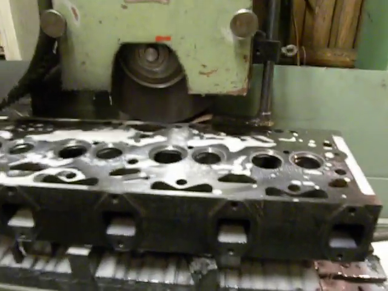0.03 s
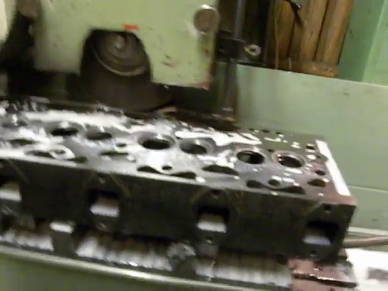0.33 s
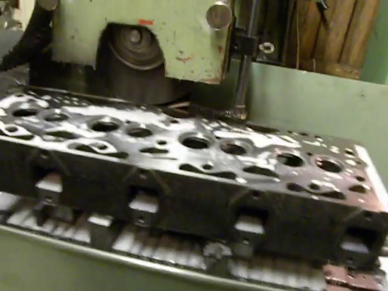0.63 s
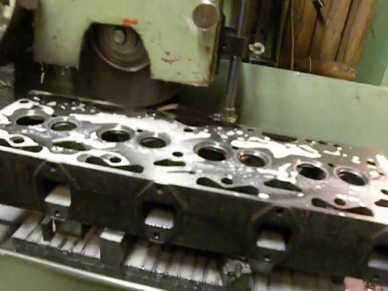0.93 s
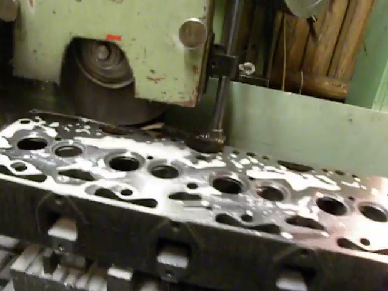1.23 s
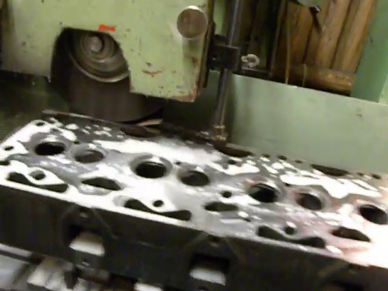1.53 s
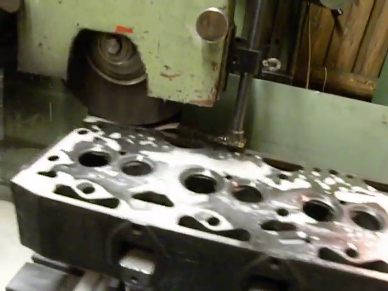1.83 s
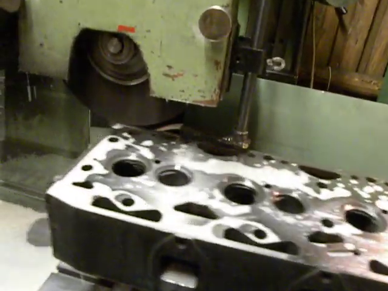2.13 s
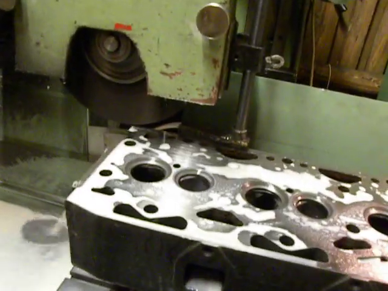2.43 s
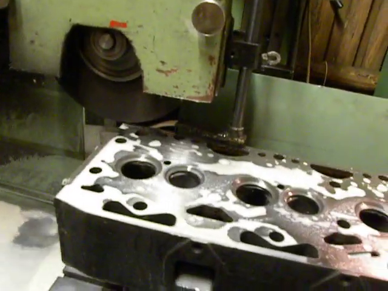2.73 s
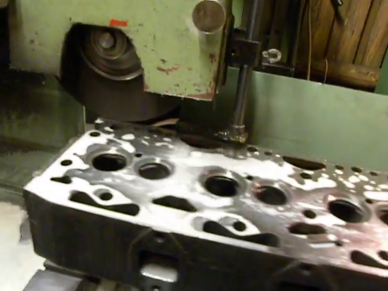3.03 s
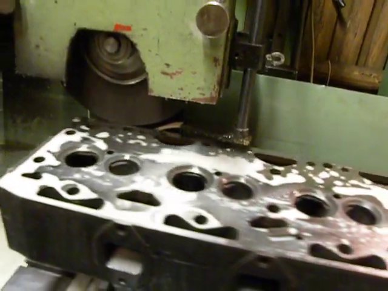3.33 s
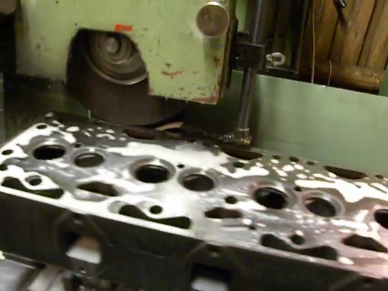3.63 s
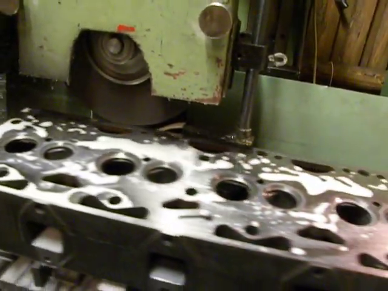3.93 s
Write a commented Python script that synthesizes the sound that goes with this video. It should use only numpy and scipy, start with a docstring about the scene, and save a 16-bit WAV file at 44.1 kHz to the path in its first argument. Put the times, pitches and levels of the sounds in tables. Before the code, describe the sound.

A surface grinder runs for the whole four seconds, a loud, even coolant hiss over the rush of its wheel on metal. Faint wavering whines and ringing sit above a low motor hum and rumble. Sharp clicks stand out at about 0.3 and 0.7 seconds, with lighter ticks scattered afterwards and a cluster near 3.5. The table shudders softly around 2.8 seconds. The sound is dry, with dulled highs.

```python
"""A surface grinder's wheel rushes and rings as a wet cylinder head travels under it.
Rubbing excites the wheel's resonances and grains scratch; coolant hisses loudly off the wheel.
Coolant plinks, dull knocks and sharp grit ticks each give a short decaying ring. Close whines beat,
the motor hums on its shaft and belt orders, the frame rumbles and the table bumps.
A narrow-band microphone picks it up; its limiter ducks after the peaks."""
import sys
import numpy as np
from scipy import signal
from scipy.fft import rfft, irfft, next_fast_len
from scipy.io import wavfile
from scipy.ndimage import uniform_filter1d, minimum_filter1d, map_coordinates

SR = 44100
rng = np.random.default_rng(int(sys.argv[2]) if len(sys.argv) > 2 else 0)


def output_pcm(signal):
    """Save a mono or channel-first signal as 16-bit PCM at the path in sys.argv[1].

    Samples are clipped to [-1, 1] before scaling.
    """
    pcm = np.clip(np.atleast_2d(signal).T, -1, 1) * 32767
    wavfile.write(sys.argv[1], SR, np.round(pcm).astype(np.int16))


N = 176400
TIME = np.arange(N) / SR
SHAFT_HZ, BELT_HZ = 48.01, 16.0
ATTACK_S = .0005  # rise time constant of short rings and scratches


def amp(db):
    """Decibels to amplitude ratio."""
    return 10 ** (np.asarray(db) / 20)


def unit(x):
    """Normalisation to rms 1."""
    return x / np.sqrt(np.mean(x ** 2) + 1e-20)


def curves(rows):
    """Linear interpolation, to one value per sample, of each column after the time."""
    times, *columns = np.transpose(rows)
    return [np.interp(TIME, times, column) for column in columns]


def wobble(knots_per_s):
    """Smooth random modulation: a spline through Gaussian values."""
    knots = rng.standard_normal(int(N * knots_per_s / SR) + 4)
    return map_coordinates(knots, [np.arange(N) * knots_per_s / SR])


def filtered(x, response):
    """Linear filtering: the spectrum of x is multiplied by a frequency response."""
    size = next_fast_len(N + SR // 2)
    return irfft(rfft(x, size) * response(np.fft.rfftfreq(size, 1 / SR)), size)[:N]


def noise_band(response):
    """White noise shaped by a frequency response, at rms 1."""
    return unit(filtered(rng.standard_normal(N), response))


def rush(spectrum, patchy_db=1.5):
    """Coloured noise of rms 1, modulated in random patches of time and frequency."""
    cells = signal.stft(rng.standard_normal(N), nperseg=1024)[2]
    patches = uniform_filter1d(rng.standard_normal(cells.shape), size=4, axis=0)
    patches = uniform_filter1d(patches, size=8, axis=1)
    noise = signal.istft(cells * amp(patchy_db * unit(patches)), nperseg=1024)[1][:N]
    hz, db = np.transpose(spectrum)
    return unit(filtered(noise, lambda f: amp(np.interp(np.log(f + 1), np.log(hz), db))))


def tone(hz, waver_db, drift_rad):
    """A sinusoid of rms 1 under slow random amplitude and phase modulation."""
    phase = 2 * np.pi * (hz * TIME + rng.random()) + drift_rad * wobble(3.12)
    return unit(np.sin(phase) * amp(waver_db * wobble(4.2497)))


def wheel_rush(gain_db=4.5):
    """Broadband noise: the spinning wheel radiates a continuous spectrum."""
    # spectrum of the rush (frequency [Hz], relative density [dB])
    spectrum = [(100, -63.5), (300, -17), (450, -2.5), (750, -0.5), (1000, -1.5), (1350, 1), (1700, -3),
                (2000, -4), (2400, -6), (3200, -34.5), (4500, -71.5)]
    # its envelope (time [s], relative level [dB])
    envelope = [(0, -30.5), (.6, -29), (1.1, -30.5), (1.65, -29), (2.15, -30), (2.65, -28.5), (2.8, -30),
                (2.95, -28), (3.5, -30.5), (3.75, -28.5), (4, -28.5)]
    return amp(curves(envelope)[0] + gain_db) * rush(spectrum)


def wheel_ring():
    """Resonance: rubbing drives two groups of narrow modes, which swell and fade with the contact."""
    # wheel modes, a lower and an upper group (frequency [Hz], bandwidth [Hz], relative level [dB])
    groups = [
        [(2434.3, 18, 0), (2460.9, 40, -1)],
        [(2996, 24, -0.5), (3074.9, 10, 1.5), (3140.2, 23, -7.5)],
    ]
    # their envelopes (time [s], lower group's level [dB], upper group's level [dB])
    envelopes = [(0, -42.5, -32.5), (.27, -28, -35), (.45, -41, -41.5), (.8, -36.5, -37.5),
                 (1.05, -36, -44.5), (1.25, -34, -38.5), (1.5, -34, -36), (1.78, -32.5, -30),
                 (2.02, -35, -37), (2.25, -36.5, -30), (2.42, -34, -30), (2.6, -28, -35.5),
                 (2.9, -44.5, -42), (3.27, -45, -27.5), (3.47, -31, -42), (3.78, -42.5, -27),
                 (4, -38, -37.5)]

    def ring(modes):
        return noise_band(lambda f: sum(amp(db) * width * f / (width * f + 1j * (f * f - hz * hz))
                                        for hz, width, db in modes))
    return sum(amp(db) * ring(modes) for modes, db in zip(groups, curves(envelopes)))


def grit(sigma_hz=670, t60_s=.02):
    """Friction transients: a grain catching under the wheel gives a broad, decaying noise burst."""
    # scratches (time [s], level [dB], centre frequency [Hz])
    scratches = [(1.2095, -9.5, 3180), (2.142, -15, 3345), (2.293, -15.5, 3200), (2.327, -14.5, 2997),
                 (2.801, -15.5, 3853), (3.37, -14.5, 3560)]
    out = np.zeros(N)
    for start, db, hz in scratches:
        age = np.maximum(TIME - start, 0)
        scratch = noise_band(lambda f: np.exp(-.5 * ((f - hz) / sigma_hz) ** 2))
        out += amp(db - 60 * age / t60_s) * (1 - np.exp(-age / ATTACK_S)) * scratch
    return out


def coolant_spray(gain_db=3.5, flutter_db=.16, pulse_depth=.047):
    """Amplitude-modulated noise: coolant hisses off the wheel, pulsing slightly with each turn."""
    # spectrum of the hiss (frequency [Hz], relative density [dB])
    spectrum = [(800, -65), (1900, -15.5), (2350, -1.5), (2800, -0.5), (3100, -0.5), (3350, -5), (3700, -5),
                (4000, -9), (4700, -8.5)]
    # its envelope (time [s], relative level [dB])
    envelope = [(0.0, -20), (0.22, -21.5), (0.41, -22.5), (2.44, -22), (2.83, -22.5), (3.24, -22.5),
                (3.48, -22), (4.0, -21.5)]
    pulse = 1 + pulse_depth * np.sin(2 * np.pi * SHAFT_HZ * TIME)
    level_db = curves(envelope)[0] + gain_db + flutter_db * wobble(120)
    return amp(level_db) * pulse * rush(spectrum)


def plinks_knocks_ticks(rise_per_s=1.2, spatter_per_s=180, spatter_hz=2732.2, spatter_t60_s=.042):
    """Damped oscillation: plinks, knocks, ticks and random spatter ring briefly, rising in pitch."""
    # coolant plinks, dull knocks and sharp grit ticks
    # (time [s], level [dB], starting frequency [Hz], 60 dB decay time [s])
    events = [(0.0276, -5, 3261, 0.0169), (.038, -9, 3212, .015), (.1314, .5, 2950, .011),
              (.3358, 9.5, 3220, .009), (.6468, -2, 3000, .012), (.6813, 8.5, 3070, .013),
              (0.6896, -1.5, 2913, 0.02274), (0.734, -7, 3261, 0.02035), (.776, -11, 1648, 0.01801),
              (.860, -8.5, 2888, 0.019), (1.1218, -9, 1642, 0.01616), (1.2125, -5, 4057, 0.011126),
              (1.6419, -8, 2949, 0.028), (1.756, -8.5, 2947, 0.0327), (2.1412, -3.5, 2761, 0.016296),
              (2.1431, -5, 3649, .008), (2.301, -10.5, 1690, 0.019), (2.868, -7, 3534, 0.024),
              (2.869, -10.5, 4435, 0.019), (3.516, -4, 2642, 0.010946), (3.535, -2, 3939, 0.01346),
              (3.5514, -2, 3070, 0.022), (3.5537, -4, 3762, .01)]
    spatter = []
    for when, strength, pitch in rng.random((int(spatter_per_s * N / SR), 3)):
        db = -29 - 3 * np.log(1 - .98 * strength)  # most are faint
        spatter.append((when * N / SR, db, spatter_hz * (1 + .28 * (pitch - .5)), spatter_t60_s))
    out, age = np.zeros(N + SR), np.arange(SR // 16) / SR
    for start, db, hz, t60 in events + spatter:
        ring = np.sin(2 * np.pi * hz * age * (1 + rise_per_s * age / 2))
        envelope = amp(db - 60 * age / t60) * (1 - np.exp(-age / ATTACK_S))
        out[round(start * SR):][:len(age)] += envelope * ring
    return out[:N]


def whines(neighbour_hz=1151.3, neighbour_db=-37):
    """Beating: the lowest two whines and a steadier neighbour between them interfere in a throb."""
    # four spindle and motor whines (frequency [Hz])
    pitches = [1144.3, 1155.5, 1683.3, 2401]
    # their levels as the microphone moves through their pattern (time [s], level of each [dB])
    envelopes = [(0, -26.5, -41, -31.5, -33.5), (.35, -39, -34, -29.5, -46), (.6, -35.5, -32.5, -38, -45.5),
                 (1.0, -32, -30, -44.5, -35), (1.25, -36, -30.5, -39.5, -25.5),
                 (1.48, -36, -35, -41, -27.5), (1.62, -35.5, -38, -38, -34),
                 (2.0, -31, -40.5, -33.5, -32.5), (2.3, -29.5, -40, -31.5, -38),
                 (2.6, -26, -38.5, -35.5, -41.5), (3.0, -30, -35.5, -35, -41.5),
                 (3.4, -29, -37, -32.5, -41.5), (3.65, -30, -40.5, -36.5, -35.5),
                 (4, -30.5, -39.5, -34.5, -45)]
    lines = sum(amp(db) * tone(hz, waver_db=1.5, drift_rad=.15)
                for hz, db in zip(pitches, curves(envelopes)))
    return lines + amp(neighbour_db) * tone(neighbour_hz, waver_db=1.5, drift_rad=.092)


def motor():
    """Rotational harmonics: shaft and belt hum at multiples of their rates, beside other machine tones."""
    # motor hum (multiple of the shaft rate, level [dB])
    shaft_orders = [(3, -44.5), (6, -39), (9, -36), (15, -38), (18, -47.5), (27, -39), (51, -38.5),
                    (52, -44)]
    # belt drone (multiple of the belt rate, level [dB])
    belt_orders = [(32, -38.5), (33, -38), (35, -46), (70, -43), (73, -46.5), (74, -43.5), (80, -42.5),
                   (82, -42)]
    # bearing, pump and gear tones (frequency [Hz], level [dB])
    tones = [(226, -46), (548, -39.5), (627, -41), (901, -43), (1462, -53.5), (1518, -42.5), (1583, -47.5),
             (2099, -48), (2681, -44), (2999, -41), (3084, -38.5)]
    shaft = sum(amp(db) * tone(k * SHAFT_HZ, waver_db=2.6352, drift_rad=.14) for k, db in shaft_orders)
    belt = sum(amp(db) * tone(k * BELT_HZ, waver_db=3, drift_rad=.15) for k, db in belt_orders)
    return shaft + belt + sum(amp(db) * tone(hz, waver_db=4, drift_rad=.39) for hz, db in tones)


def frame_rumble():
    """Structural vibration: the frame radiates low-frequency noise."""
    # spectrum of the rumble (frequency [Hz], relative density [dB])
    spectrum = [(20, -29), (70, -31), (105, -23.5), (135, -9.5), (180, -6.5), (240, 0), (330, 2.5),
                (430, -1.5), (600, -18.5), (1000, -64)]
    # its envelope (time [s], level [dB])
    envelope = [(0, -38.5), (.25, -33), (.7, -36.5), (.97, -36.5), (1.3, -35.5), (2, -36), (2.6, -36),
                (2.8, -32.5), (3.05, -33.5), (3.45, -39.5), (3.8, -33.5), (4, -35.5)]
    return amp(curves(envelope)[0]) * rush(spectrum)


def table_bumps(sigma_octaves=.4):
    """Transient vibration: the travelling table bumps, and shudders as it reverses."""
    # Gaussian noise pulses (time [s], half-width [s], level [dB], centre frequency [Hz])
    bumps = [(0.963, .03, -30.5, 290.3), (2.662, 0.022, -33, 196.9), (2.781, 0.043, -24.5, 721.8),
             (2.813, .035, -30.5, 242.3), (2.939, .025, -33.5, 210.5)]
    out = np.zeros(N)
    for peak, width, db, hz in bumps:
        thud = noise_band(lambda f: np.exp(-.5 * (np.log2((f + 1) / hz) / sigma_octaves) ** 2))
        out += amp(db) * np.exp(-((TIME - peak) / width) ** 2) * thud
    return out


def workshop(x, guard_s=.0072, guard_db=-13.5, room_db=-5.5, t60_s=.15):
    """Reflection and reverberation: the splash guard returns an echo and the room adds a short tail."""
    age = np.arange(SR // 4) / SR
    tail = rng.standard_normal(len(age)) * amp(-60 * age / t60_s)
    echo = np.pad(x, (round(guard_s * SR), 0))[:N]
    reverberation = signal.fftconvolve(x, tail / np.linalg.norm(tail))[:N]
    return x + amp(guard_db) * echo + amp(room_db) * reverberation


def scene():
    """Superposition of machine and coolant; only the short rings and scratches reverberate."""
    machine = motor() + whines() + frame_rumble() + wheel_rush() + wheel_ring() + table_bumps()
    return (machine + coolant_spray() + workshop(plinks_knocks_ticks() + grit()))[None]


def limiter(x, threshold_db=-5, attack_s=.00075, ahead_s=.00016, hold_s=.03, recover_s=.02):
    """Peak limiting: the gain drops quickly above the threshold, holds and recovers."""
    over_db = np.maximum(20 * np.log10(np.abs(x) + 1e-9) - threshold_db, 0)
    half_hold = round(hold_s * SR / 2)
    held_db = -minimum_filter1d(-over_db, 2 * half_hold + 1, origin=half_hold)
    fade = TIME / recover_s
    cut_db = np.exp(np.maximum.accumulate(np.log(held_db + 1e-9) + fade) - fade)  # exponential release
    attack, ahead = round(attack_s * SR), round(ahead_s * SR)
    smooth_cut_db = np.convolve(cut_db, np.ones(attack) / attack)[ahead:][:N]
    return x * amp(-smooth_cut_db)


def saturate(x, knee_db=-4, ceiling_db=-2.7):
    """Soft clipping: peaks above the knee are rounded off towards the ceiling."""
    knee = amp(knee_db)
    headroom = amp(ceiling_db) - knee
    clean = np.clip(x, -knee, knee)
    return clean + headroom * np.tanh((x - clean) / headroom)


def record(dry, mic_top_hz=4727, top_hz=15870):
    """Band limiting and compression: a narrow-band microphone, limiter, soft clipper and low-pass."""
    # microphone response (frequency [Hz], gain [dB])
    response = [(20, 0), (3300, 0.5), (3650, -1.5), (3850, -6), (4000, -12), (4250, -15), (4420, -26.5),
                (4600, -46.5), (4800, -67.5)]
    hz, db = np.transpose(response)
    picked_up = filtered(dry[0], lambda f: amp(np.interp(f, hz, db)) * (f < mic_top_hz))
    return filtered(saturate(limiter(picked_up)), lambda f: f < top_hz)[None]


dry = scene()
out = record(dry)
output_pcm(out)
```